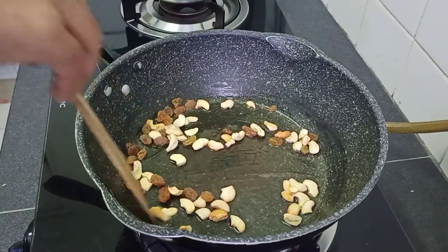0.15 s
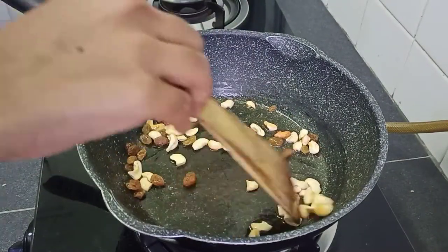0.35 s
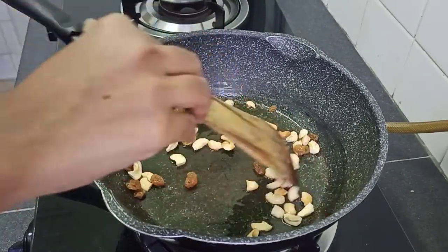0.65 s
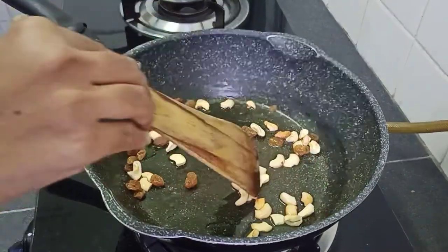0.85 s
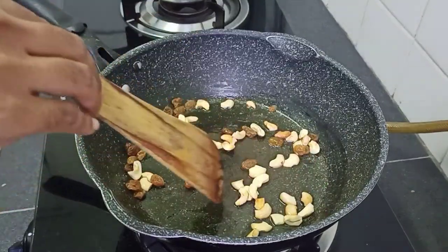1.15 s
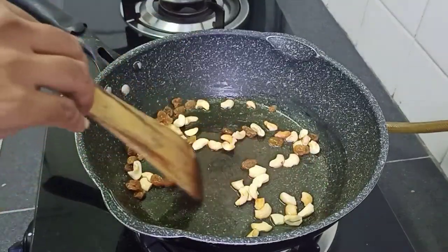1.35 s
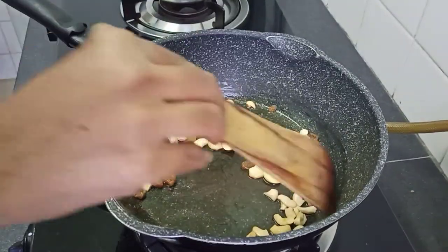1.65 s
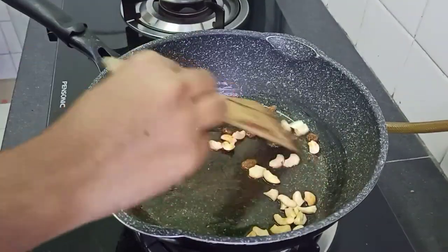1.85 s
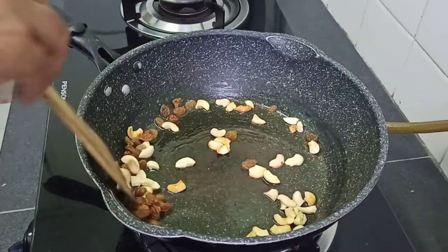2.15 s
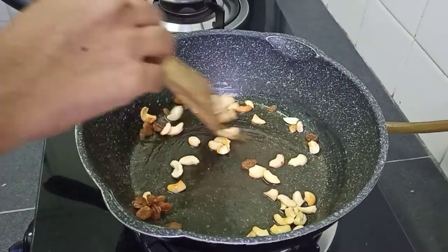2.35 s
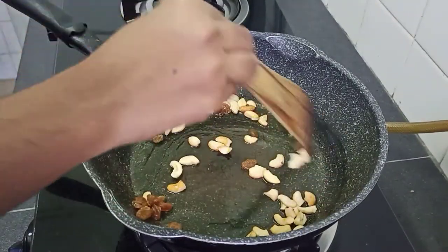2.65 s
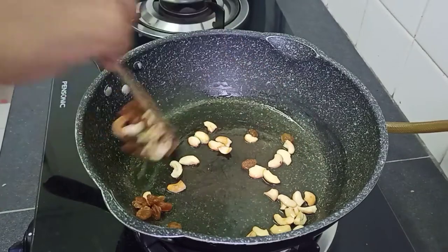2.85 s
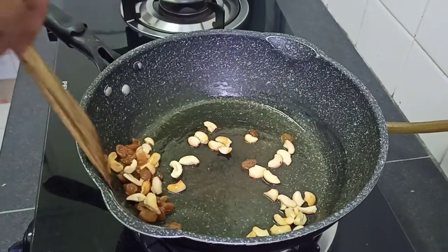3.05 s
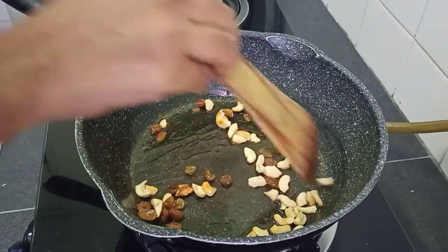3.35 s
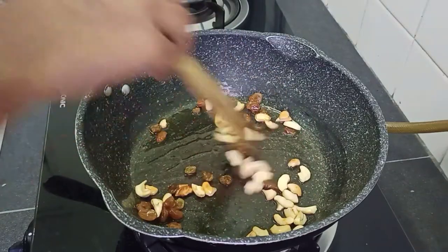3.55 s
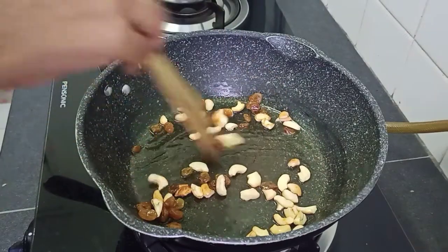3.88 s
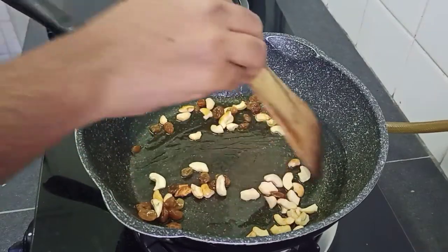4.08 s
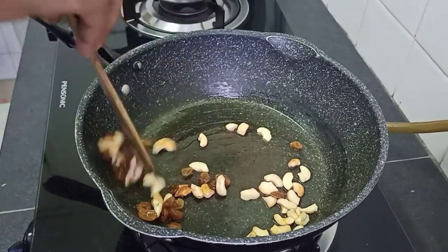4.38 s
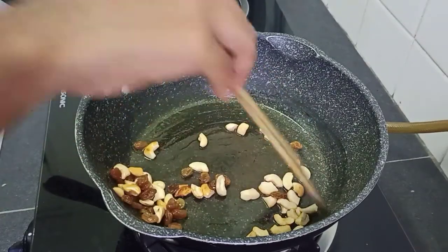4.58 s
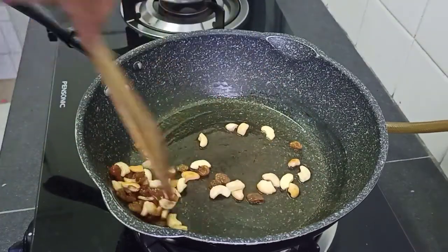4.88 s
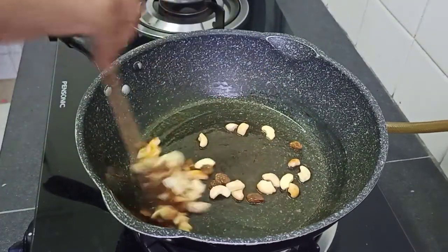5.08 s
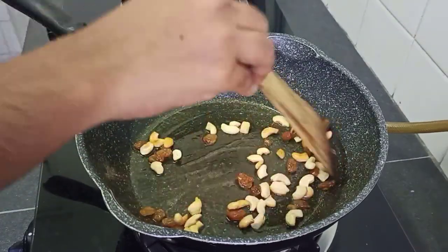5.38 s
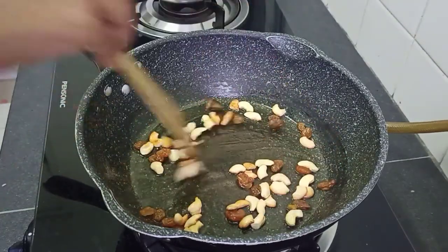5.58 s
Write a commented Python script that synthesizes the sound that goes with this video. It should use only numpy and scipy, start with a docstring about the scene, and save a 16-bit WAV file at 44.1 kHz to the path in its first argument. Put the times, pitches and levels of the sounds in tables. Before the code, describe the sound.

Bright, crackling frying with popping bubbles, stirred by a wooden spatula that thuds, clacks and scrapes on a coated pan over a soft burner rush.

```python
"""Nuts and raisins fry in a little ghee in a coated metal pan on a gas burner, in a tiled kitchen, heard close up.
Steam bubbles sizzle throughout (filtered random clicks), flaring up when the nuts are turned into fresh fat;
single bubbles pop and a raisin spits. A wooden spatula knocks on the pan floor and clacks on the wall (noise bursts
with pan modes), scrapes, squeaks, slips and judders (jolts through resonances), scuffs and creaks (pulse tones).
Behind them lie the burner's rush and hum (filtered noise) and the kitchen's echoes (a decaying noise tail)."""
import sys
import numpy as np
from scipy import signal
from scipy.fft import rfft, irfft
from scipy.io import wavfile

SR = 44100
rng = np.random.default_rng(int(sys.argv[2]) if len(sys.argv) > 2 else 0)


def wrap_up_sound(samples):
    """Save the sound to the file named by the first command line argument, as 16-bit audio."""
    columns = np.atleast_2d(samples).T
    # keep every value between -1 and 1, then stretch to whole-number steps
    tamed = np.clip(columns, -1, 1)
    steps = np.round(tamed * 32767).astype(np.int16)
    wavfile.write(sys.argv[1], SR, steps)


N = 252252  # samples
EDGE_HZ = 15750  # upper edge of the recorded band

# thud of wood on the pan floor: (frequency [Hz], relative density [dB per Hz])
THUD = [(88, -82), (150, -5), (201, -21.5), (341, -13), (427, -9), (581, -0.5), (643, -5.5), (804, -11.5),
        (1080, -7.5), (1210, -3.5), (1520, -16.5), (1650, -11), (3390, -18.5), (5110, -18), (9000, -17),
        (11700, -63), (19800, -120)]
# ringing modes of the pan floor: (frequency [Hz], level [dB], time to die by 60 dB [s])
FLOOR_MODES = [(268, -5.5, .3), (328, -6, .32), (360, -3.5, .28), (448, -9, .3), (503, -4, .2),
               (526, -3, .3), (561, .5, .38), (588, 1.5, .42), (698, -6, .26), (789, -4, .27),
               (930, -8, .2), (1015, -9, .2), (1215, -5, .22), (1635, -11, .22), (1912, -16, .25)]


def amp(db):
    """Decibels to gain."""
    return 10 ** (np.asarray(db) / 20)


def evened(x):
    """Scales to rms 1."""
    return x / np.sqrt(np.mean(x ** 2) + 1e-20)


def attack_evened(x, size=800):
    """Scales a hit so that its first samples, the attack, have rms 1."""
    return x / np.sqrt(np.mean(x[:size] ** 2) + 1e-20)


def read(points, hz):
    """Reads a spectrum on a log-frequency axis."""
    point_hz, value = np.transpose(points)
    return np.interp(np.log(hz + 1), np.log(point_hz), value)


def add(mix, s, sound):
    """Lays a sound into the mix at time s."""
    part = mix[max(round(s * SR), 0):][:len(sound)]
    part += sound[:len(part)]


def colour(x, points, tilt_db=0, size=4096):
    """Causal minimum-phase filter with the given spectrum, tilted by some dB per octave."""
    hz = abs(np.fft.fftfreq(size, 1 / SR))
    tilt = tilt_db * np.log2(np.clip(hz, 300, 9000) / 1000)
    log_gain = np.log(amp(np.maximum(read(points, hz), -90) + tilt))
    taps = np.fft.ifft(np.exp(np.conj(signal.hilbert(log_gain)))).real
    return signal.oaconvolve(x, taps[:size // 2])[:len(x)]


def resonate(x, hz, width):
    """One resonance, fixed or gliding, that passes about the same noise power at any width."""
    turn = np.exp(2j * np.pi * np.cumsum(hz * np.ones(len(x))) / SR)
    r = np.exp(-np.pi * width / SR)
    # shift the pitch down to zero, smooth, and shift back up
    smooth = signal.lfilter([1], [1, -r], x / turn + 1e-18)
    return 2 * np.sqrt(1 - r) * (turn * smooth).real


def resonate_twice(x, hz, width):
    """Two equal resonances in a row, with steeper skirts."""
    return resonate(resonate(x, hz, width), hz, width)


def wander(per_s):
    """Smooth random drift of rms 1; a higher per_s [Hz] makes it faster."""
    lowpass = np.exp(-(np.fft.rfftfreq(N, 1 / SR) / per_s) ** 2)
    return evened(irfft(rfft(rng.standard_normal(N)) * lowpass, N))


def clicks(per_s, spread_db):
    """Random clicks of either sign, mostly small, a few large."""
    size = amp(spread_db * np.minimum(rng.exponential(1, N), 6))
    return size * rng.choice([-1, 1], N) * (rng.random(N) < per_s / SR)


def boiling():
    """Gain of the sizzle and of its finest bubbles: each stir flares up, holds and settles back to the calm."""
    # nuts turned into fresh fat: (start [s], length [s], level [dB], extra treble of the finest bubbles [dB])
    stirs = [(-.1, 0.15, -32.5, 0), (0.231, 0.17, -38, -2), (0.492, .13, -42.5, -7),
             (0.849, 0.31, -44, -24), (1.304, 0.23, -48.5, -15), (1.858, .45, -37, 0),
             (2.465, 0.29, -40.5, 3), (2.728, .1, -33, -2.5), (3.111, .3, -36.5, 3), (3.548, 0.36, -37, 1),
             (4.219, 0.2, -34, -6), (4.681, .14, -39, -13), (5.101, .2, -35.5, 3.5), (5.563, 0.2, -36, 3.5)]
    flare_s, settle_s = .05, .18
    calm_db, calm_treble_db = -41.5, -1.5  # the fat left alone
    t = np.arange(N) / SR
    power, fine_power = amp(calm_db) ** 2, amp(calm_db + calm_treble_db) ** 2
    for start, length, db, treble_db in stirs:
        rise = 1 - np.exp(-np.maximum(t - start, 0) / flare_s)
        settle = np.exp(-np.maximum(t - start - length, 0) / settle_s)
        flare = rise * settle
        power = power + (amp(db) * flare) ** 2
        fine_power = fine_power + (amp(db + treble_db) * flare) ** 2
    return np.sqrt(power), np.sqrt(fine_power)


def sizzle(level, fine_level, fizz_db, crackle_db):
    """Countless tiny bubbles make a fizz; fewer, larger ones crackle, each at its own pitch."""
    # colour of the frying fat: (frequency [Hz], relative density [dB per Hz])
    fat_spectrum = [(880, -29), (1500, -12), (1640, -8), (1950, -12), (2110, -17), (2400, -17.5),
                    (2700, -11), (3250, -12.5), (4060, -7), (6750, -7), (8130, 1.5), (9990, -7.5),
                    (12100, -10), (14900, -2), (15500, -1.5)]
    flutter_db, flutter_per_s = 1, 35
    fizz = evened(clicks(per_s=9900, spread_db=2.0))
    pitches = np.linspace(3500, 15000, num=8)  # Hz
    crackle = evened(sum(resonate(clicks(per_s=85, spread_db=2.5), hz, 1100) for hz in pitches))
    fat = evened(colour(amp(fizz_db) * fizz + amp(crackle_db) * crackle, fat_spectrum))
    # the finest bubbles are the treble of the sizzle
    fine = signal.sosfilt(signal.butter(1, 10500, "high", fs=SR, output="sos"), fat)
    flutter = amp(flutter_db * wander(flutter_per_s))
    return (level * (fat - fine) + fine_level * fine) * flutter


def snaps(rows, burst_s):
    """Short pitched snaps: each a noise burst of a few cycles through a resonance."""
    out, t = np.zeros(N), np.arange(SR // 40) / SR
    for s, db, hz in rows:
        pitch, width = min(hz, EDGE_HZ), .42 * hz
        burst = rng.standard_normal(len(t)) * np.exp(-t / burst_s)
        snap = resonate_twice(burst, pitch, width)
        add(out, s, amp(db) * snap / abs(snap).max())
    return out


def small_pops(level):
    """Rows of chance bubbles, which come more often where the sizzle is strong."""
    # pitches the small bubbles favour: (frequency [Hz])
    favoured_hz = (8150, 13700, 15000)
    pops_per_s, peak_db, spread_db = 7.9, -24.5, 2.5
    when, size, kind = rng.random((round(pops_per_s * N / SR), 3)).T
    times = np.searchsorted(np.cumsum(level ** 2) / np.sum(level ** 2), when) / SR
    pitches = np.take(favoured_hz, (kind * len(favoured_hz)).astype(int))
    return list(zip(times, peak_db + spread_db * (2 * size - 1), pitches))


def pops(level):
    """Single bubbles burst, the largest at set times and smaller ones at random."""
    # the largest bubbles: (time [s], peak level [dB], pitch [Hz])
    large_pops = [(.1335, -23, 14200), (1.8283, -23.5, 14500), (2.218, -22, 9700), (2.2652, -22, 10800),
                  (3.2125, -20, 8900), (3.3752, -15, 8300), (3.499, -17, 15000), (3.6725, -13, 8300),
                  (4.3345, -20, 15000), (4.5837, -22.5, 9600)]
    return snaps(large_pops + small_pops(level), burst_s=0.0005)


def spits():
    """Juice of a wet raisin meets hot fat: a volley of like bubbles that dies away."""
    # volleys: (time [s], dying time [s], level [dB])
    volleys = [(2.806, 0.039, -32.5), (3.671, 0.026, -25.5)]
    t = np.arange(N) / SR
    bubbles = evened(resonate_twice(clicks(per_s=2600, spread_db=1.5), hz=8300, width=1600))
    return bubbles * sum(amp(db) * (t > s) * np.exp(-abs(t - s) / dying_s) for s, dying_s, db in volleys)


def ringing(modes):
    """Dying modes of a struck pan; it is not quite round, so each mode is a slowly beating pair."""
    t = np.arange(SR // 2) / SR
    split_hz = rng.uniform(4, 14, len(modes)) * rng.choice([-1, 1], len(modes))
    ring = np.zeros(len(t))
    for k, ((hz, db, t60), beat_hz) in enumerate(zip(modes, split_hz)):
        pair = np.sin(2 * np.pi * hz * t) + .5 * np.sin(2 * np.pi * (hz + beat_hz) * t)
        ring += (-1) ** k * amp(db - 60 * t / t60) * pair
    return ring


def blows(rows, spectrum, modes, crack, crack_s, wood_db, wood_width):
    """Wood meets metal: a crack, a brief rattle that sounds the spatula, and the ring of the pan."""
    out, t = np.zeros(N), np.arange(SR // 2) / SR
    for s, db, tilt_db, rattle_s, ring_db, wood_hz, lowest_hz in rows:
        envelope = np.exp(-t / max(rattle_s, 1 / SR)) + crack * np.exp(-t / crack_s)
        contact = rng.standard_normal(len(t)) * envelope
        wood = resonate_twice(contact, wood_hz, wood_hz * wood_width)
        body = attack_evened(colour(contact, spectrum, tilt_db)) + amp(wood_db) * attack_evened(wood)
        blow = body + amp(ring_db) * attack_evened(ringing(modes))
        # a glancing blow, or one on a stiff spot, cannot stir the lowest modes
        low_cut = signal.butter(4, lowest_hz, "high", fs=SR, output="sos")
        add(out, s, amp(db) * attack_evened(signal.sosfilt(low_cut, blow)))
    return out


def knocks():
    """The spatula lands on the pan floor, whose low modes ring."""
    # landings: (time [s], attack level [dB], brightness [dB per octave], rattle time [s],
    # ring of the floor [dB], pitch of the wood [Hz], lowest pitch stirred [Hz])
    landings = [(0.243, -31, -2, 0.032, -1, 1010, 358), (0.4705, -30, -8.5, 0.014, -5.5, 282, 222),
                (1.3625, -26, -3.5, 0.0037, -2.5, 920, 446), (1.704, -34.5, -7.5, 0.035, -6, 282, 217),
                (2.6295, -16.5, -2.5, 0.012, -2, 740, 275), (2.785, -26.5, -2.5, 0.0099, 1, 1150, 307),
                (3.505, -27, -5.5, 0.007, -6.5, 496, 280), (3.883, -26.5, -2, 0.026, -4.5, 750, 256),
                (4.1625, -26, -6.5, 0.014, -13, 610, 250), (4.654, -18, -1.5, 0.023, 3.5, 1180, 220),
                (5.428, -28.5, -8.5, 0.014, -12, 730, 284)]
    return blows(landings, THUD, FLOOR_MODES, crack=0.13, crack_s=0.0015, wood_db=-10.5, wood_width=0.28)


def clacks():
    """The spatula hits the pan wall, whose modes ring higher than the floor's."""
    # hits: (time [s], attack level [dB], brightness [dB per octave], rattle time [s],
    # ring of the wall [dB], pitch of the wood [Hz], lowest pitch stirred [Hz])
    hits = [(0.1675, -33.5, 1, 0.0066, -18, 2760, 590), (3.0785, -15, 3, 0.019, -3, 7300, 310),
            (3.8065, -30.5, 2.5, 0.01, -18, 3340, 275), (5.0205, -33.5, 8, 0.0076, -7, 4000, 504),
            (5.050, -36, 0.5, 0.0067, -27, 3540, 486)]
    # colour of the contact: (frequency [Hz], relative density [dB per Hz])
    contact_spectrum = [(120, -64), (200, 3), (282, 4), (383, -12.5), (476, 7.5), (647, -11), (1200, -9),
                        (1360, -12.5), (2210, -18), (2900, -13.5), (3540, -16.5), (4810, -9.5),
                        (15000, -36)]
    # ringing modes of the wall: (frequency [Hz], level [dB], time to die by 60 dB [s])
    wall_modes = [(1215, -5, .22), (1635, -8, .26), (2925, -8.5, .37), (3930, -13, .35), (4160, -4, .17),
                  (4355, 2, .22), (4642, 1, .2), (4958, -3, .22), (5918, -1, .24), (6337, -7, .26),
                  (7255, -6, .2), (8350, -6, .17)]
    return blows(hits, contact_spectrum, wall_modes, crack=0.16, crack_s=0.0013, wood_db=-10.0, wood_width=0.19)


def stroke(start, length, db, change_db):
    """Gain over time of one push of the blade: it bites, slowly fades or swells, and lifts off."""
    push_s, lift_s = .03, .025
    t = np.arange(N) / SR - start
    contact = np.clip(t / push_s, 0, 1) * np.clip((length - t) / lift_s, 0, 1)
    return contact * amp(db + change_db * np.clip(t / length, 0, 1) ** 2)


def scrape(judder_db, ring_db, rattle_db):
    """Blade and nuts catch on the pan floor in many small jolts, and the nuts rattle against each other."""
    # blade pushing nuts along the pan: (start [s], length [s], level [dB])
    strokes = [(-.02, 0.079, -33), (.28, 0.15, -40.5), (0.543, 0.26, -41.5), (0.853, 0.27, -45.5),
               (1.95, 0.32, -49.5), (2.695, 0.23, -39), (2.852, 0.083, -50), (3.204, 0.13, -35),
               (3.32, 0.13, -47), (3.55, 0.094, -41.5), (3.933, 0.11, -38), (4.2, 0.3, -43.5),
               (4.763, 0.19, -37.5), (5.015, 0.12, -39.5), (5.127, 0.22, -31.5), (5.462, 0.074, -37),
               (5.55, 0.12, -40.5)]
    # colour of the rubbing: (frequency [Hz], relative density [dB per Hz])
    rub_spectrum = [(150, -39), (250, -4), (351, -15.5), (579, 4.5), (640, -7.5), (708, -2), (932, -9.5),
                    (1010, -4), (1290, -9), (1450, -22), (1680, -14), (3220, -24.5), (5000, -21),
                    (6500, -46), (11000, -120)]
    fade_db = -15.5  # each push fades as the nuts slide away
    jolts = clicks(per_s=1800, spread_db=0.5) * amp(judder_db * wander(per_s=21))
    rub = evened(colour(jolts, rub_spectrum))
    ring = evened(signal.oaconvolve(jolts, ringing(FLOOR_MODES))[:N])
    rattle = evened(resonate_twice(clicks(per_s=350, spread_db=2.0), hz=2030, width=1370))
    pushing = sum(stroke(*row, fade_db) for row in strokes)
    return evened(rub + amp(ring_db) * ring + amp(rattle_db) * rattle) * pushing


def squeal(drive, s, width, bright_db=0):
    """The resonances of the rubbing blade edge, which shift as it tips up."""
    # blade edge on the coating: (pitch lying flat [Hz], pitch on its tip [Hz], width [Hz] before
    # the width factor, level [dB] before the brightness)
    edge_modes = [(1700, 1900, 620, -8), (4780, 4580, 90, 0), (7290, 7720, 150, -4), (7500, 7050, 220, -11),
                  (9800, 9550, 200, -14), (11620, 11800, 250, -17)]
    # how the blade is held: (time [s], tilt [0 flat to 1 on its tip])
    blade_tilt = [(1.04, 0.043), (1.064, 0.92), (1.11, 1), (1.2, .85)]
    tilt = np.interp(s + np.arange(len(drive)) / SR, *np.transpose(blade_tilt))
    out = np.zeros(len(drive))
    for flat, tip, mode_width, db in edge_modes:
        gain = amp(db + bright_db * np.log2(flat))
        out += gain * resonate(drive, flat + (tip - flat) * tilt, mode_width * width)
    return out


def slips(snap):
    """The stuck blade lets go with a snap and chatters for a moment."""
    # blade snapping free: (time [s], level [dB] of the squeal's attack, resonance width [factor],
    # chatter time [s], thud of the pan against the squeal [dB], brightness [dB per octave])
    releases = [(0.7984, -17.5, 0.8, 0.0049, -8, -0.5), (1.0635, -18, 0.96, 0.0037, -52, 0.5)]
    out, t = np.zeros(N), np.arange(SR // 4) / SR
    for s, db, width, chatter_s, thud_db, bright_db in releases:
        chatter = rng.standard_normal(len(t)) * np.exp(-t / chatter_s)
        drive = chatter / np.linalg.norm(chatter) + snap * (t == 0)
        thud = amp(thud_db) * attack_evened(colour(drive, THUD))
        add(out, s, amp(db) * (attack_evened(squeal(drive, s, width, bright_db)) + thud))
    return out


def drag(judder_db):
    """Fast stick and slip keeps the blade squealing thinly."""
    # blade dragging under pressure: (start [s], length [s], level [dB], change over the stroke [dB])
    drags = [(0.524, 0.16, -48, 9), (0.795, 0.12, -38, -9), (0.895, 0.14, -41, -1.5),
             (1.088, 0.058, -32.5, -7), (1.146, 0.065, -42, -10)]
    grip = clicks(per_s=7000, spread_db=1.0) * amp(judder_db * wander(per_s=240))
    return evened(squeal(grip, 0, width=0.53)) * sum(stroke(*row) for row in drags)


def scuff_and_creak(width_hz):
    """A rough scuff of the blade, then a wooden creak with a steadier pitch: pulses through a resonance."""
    # scuff, then creak: (start [s], length [s], level [dB], pitch [Hz],
    # unsteadiness of the pitch [fraction], centre of the resonance [Hz])
    rubs = [(0.609, 0.069, -39.5, 930, 0.145, 1740), (4.803, 0.05, -37, 613, 0.034, 1310)]
    out = np.zeros(N)
    for s, length, db, hz, jitter, resonance_hz in rubs:
        turns = np.cumsum(hz * (1 + jitter * wander(per_s=166)[:round(length * SR)])) / SR
        pulses = sum(np.cos(2 * np.pi * k * turns) for k in range(1, 5))
        tone = resonate(pulses, resonance_hz, width_hz)
        add(out, s, amp(db) * evened(tone) * signal.windows.tukey(len(tone), .5))
    return out


def judders_and_ticks():
    """Small judders of the blade and ticks of nuts, each a short pitched snap."""
    # judders and ticks: (time [s], peak level [dB], pitch [Hz])
    small_snaps = [(.712, -32, 1810), (.763, -33, 1710), (1.026, -25.5, 1810), (2.02, -35, 1300),
                   (2.740, -21, 4740), (2.941, -33, 4670), (4.339, -28, 1570), (5.643, -27, 4230)]
    return snaps(small_snaps, burst_s=0.00098)


def burner():
    """The soft rush of the flame (coloured noise) and a wavering low hum (narrow bands of noise)."""
    # colour of the flame: (frequency [Hz], relative density [dB per Hz])
    flame_spectrum = [(15, -78), (25, -23), (58, -19), (93, 2), (208, -15.5), (318, -7), (350, -16),
                      (386, -10.5), (425, -16.5), (578, -14.5), (743, -19.5), (1180, -21.5), (1400, -30.5),
                      (1670, -29.5), (2500, -32), (3250, -28), (5500, -120)]
    # low hum: (frequency [Hz], level [dB])
    hum_bands = [(92, -72), (145, -53.5)]
    flame_db = -45
    hum = sum(amp(db) * evened(resonate(rng.standard_normal(N), hz, 7.9)) for hz, db in hum_bands)
    return amp(flame_db) * evened(colour(rng.standard_normal(N), flame_spectrum)) + hum


def kitchen(x):
    """Dense echoes from tiles and worktop, each band dying at its own speed."""
    # echoes of the room: (frequency [Hz], time to die by 60 dB [s])
    echo_times = [(150, 0.99), (600, 0.42), (3000, 0.39), (8000, 0.25), (15000, 0.057)]
    hz, t, bands = signal.stft(rng.standard_normal(SR // 2), SR, nperseg=256)
    decay = amp(-60 * t / read(echo_times, hz)[:, None])
    tail = signal.istft(bands * decay, SR, nperseg=256)[1]
    tail[:SR // 250] = 0  # no echo in the first 4 ms
    return signal.oaconvolve(x, tail / np.linalg.norm(tail))[:N]


def scene():
    """Frying and spatula sound from one spot close to the microphone, with the kitchen behind."""
    level, fine_level = boiling()
    frying = sizzle(level, fine_level, fizz_db=-2.5, crackle_db=-13.0) + spits() + pops(level)
    rubbing = slips(snap=0.36) + drag(judder_db=2) + scuff_and_creak(width_hz=190)
    scraping = scrape(judder_db=2.5, ring_db=-8, rattle_db=-20)
    spatula = knocks() + clacks() + rubbing + judders_and_ticks() + scraping
    echoes = amp(-12.5) * kitchen(frying) + amp(-6.5) * kitchen(spatula)
    sound = frying + spatula + echoes + burner()
    return np.array([sound, sound])  # both channels alike


def record(dry):
    """The recorder rounds off the loudest peaks and limits the band."""
    ceiling = .75
    rounded = ceiling * np.tanh(dry / ceiling)
    band_limit = signal.firwin(511, EDGE_HZ, window=("kaiser", 9), fs=SR)
    return signal.oaconvolve(rounded, band_limit[None], "same")


dry = scene()
out = record(dry)
wrap_up_sound(out)
```